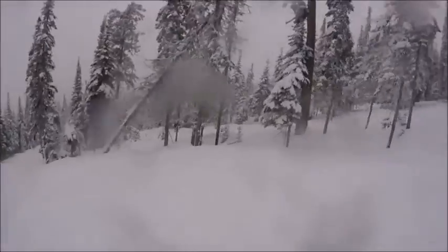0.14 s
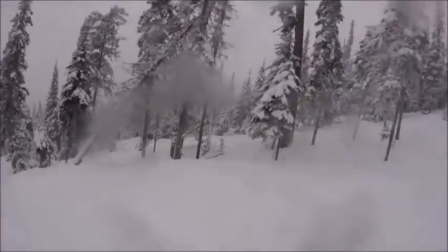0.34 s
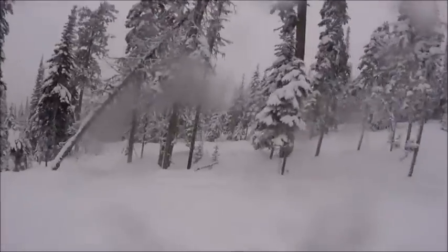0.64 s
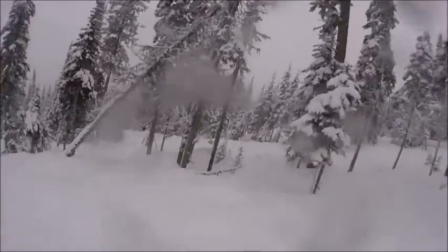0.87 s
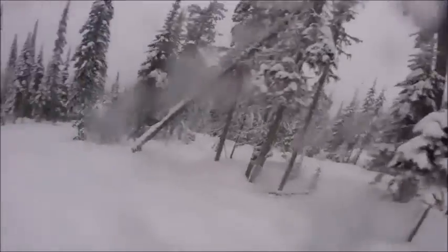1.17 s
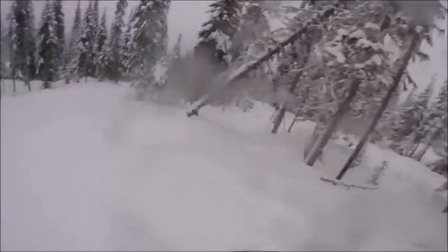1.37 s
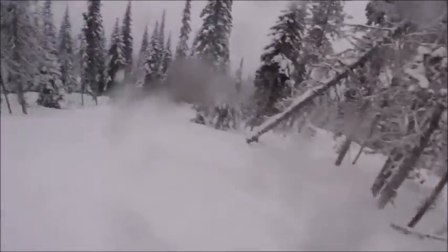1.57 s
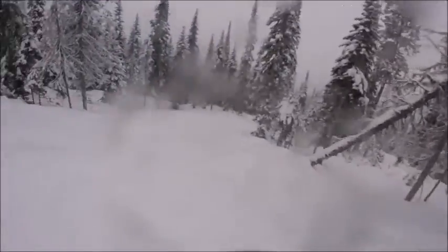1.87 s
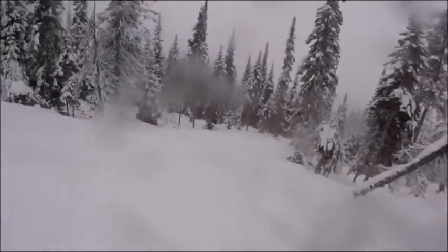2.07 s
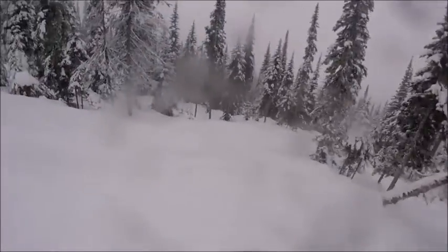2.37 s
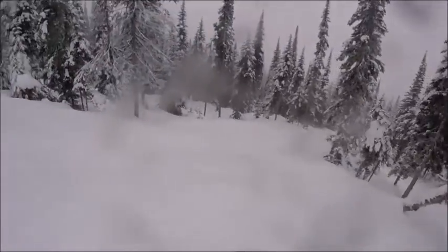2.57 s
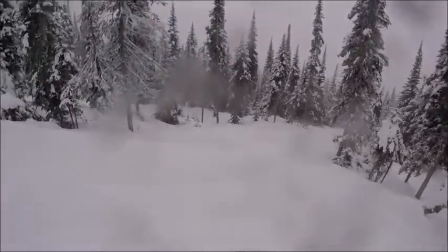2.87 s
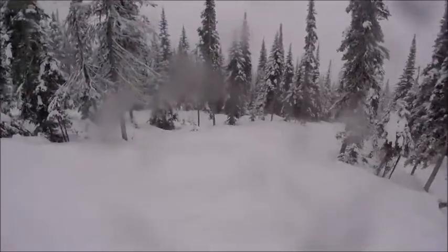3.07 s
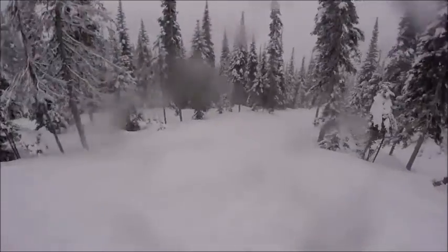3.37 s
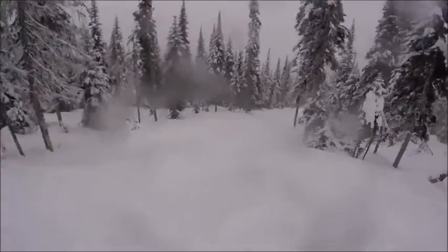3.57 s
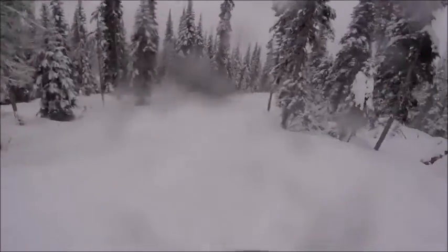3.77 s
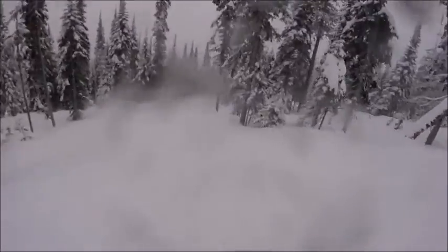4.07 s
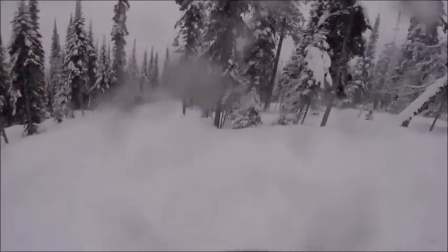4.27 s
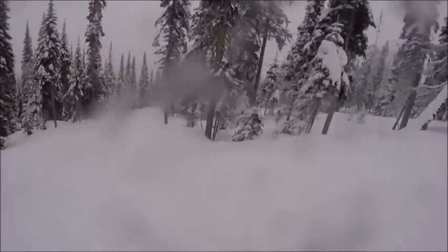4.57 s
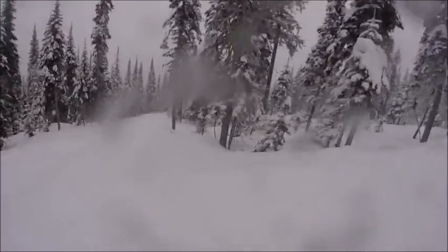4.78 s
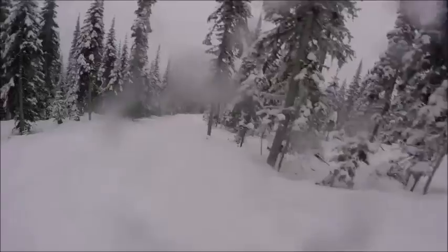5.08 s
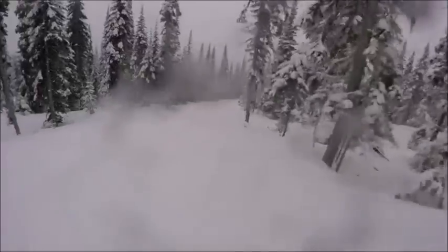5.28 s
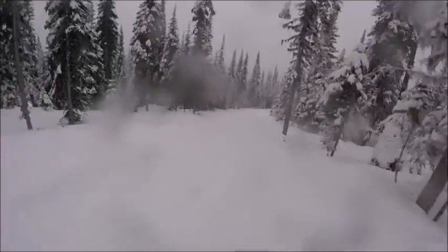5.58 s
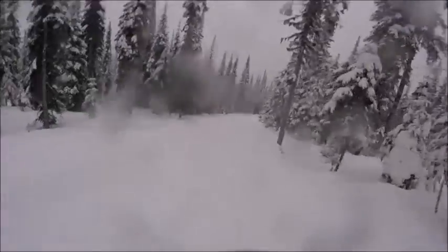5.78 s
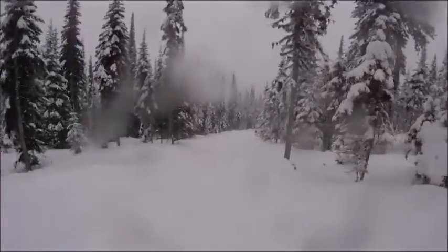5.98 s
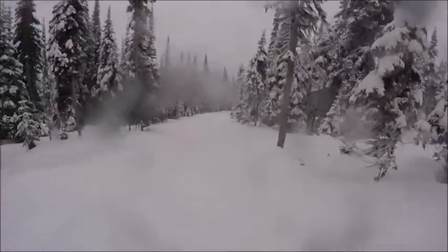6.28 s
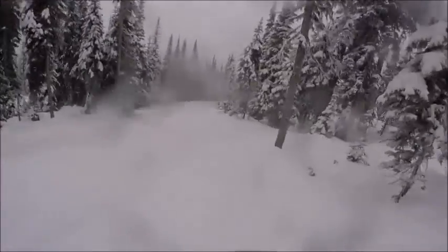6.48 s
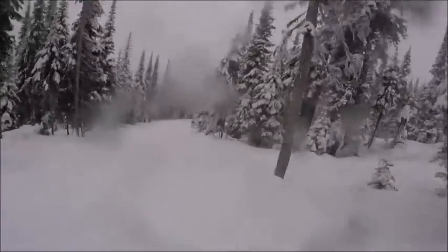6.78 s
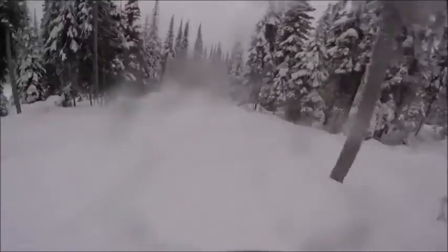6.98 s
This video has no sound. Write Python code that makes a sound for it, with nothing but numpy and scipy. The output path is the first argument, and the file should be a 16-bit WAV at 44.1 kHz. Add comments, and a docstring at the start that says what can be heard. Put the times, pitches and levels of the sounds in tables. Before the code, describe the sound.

A small camera clacks and thumps in its hard plastic housing as skis glide through deep powder, with muffled wind and faint snow ticks.

```python
"""A small camera knocks about in its hard housing as a skier glides through deep powder. Each knock is a short
push on the wall with a bright landing click and a duller lift-off click. Thuds are low swings of the soft pad
the camera falls back on; each blow leaves a slow wobble. Snow grains tick, sharp ticks come with some thuds,
and soft brushes hiss on the ringing shell, over muffled wind and ski hiss."""
import sys
import numpy as np
from scipy import signal
from scipy.io import wavfile
from scipy.ndimage import uniform_filter1d

SR = 44100
rng = np.random.default_rng(int(sys.argv[2]) if len(sys.argv) > 2 else 0)


def inscribe(sig):
    """Save sig as 16-bit PCM at rate SR to the path in sys.argv[1].

    A 1-D sig is mono; a 2-D sig holds one channel per row.
    Samples are clipped to [-1, 1] before scaling.
    """
    pcm = np.round(np.clip(np.atleast_2d(sig).T, -1, 1) * 32767)
    wavfile.write(sys.argv[1], SR, pcm.astype(np.int16))


N = 314874  # length in samples


def gain_of(db):
    """Turns decibels into a linear gain."""
    return 10 ** (np.asarray(db) / 20)


def evened(x):
    """Scales to rms 1."""
    return x / np.sqrt(np.mean(x ** 2) + 1e-20)


def add(mix, start_s, sound):
    """Mixes a sound in at a time, cut off at the end of the mix."""
    part = mix[max(round(start_s * SR), 0):][:len(sound)]
    part += sound[:len(part)]


def noise(spectrum, size, patchy_db, flicker_db, swell=0):
    """Random short-time spectra with drifting patches and a flicker shared by all bins, part of it slow."""
    frames = 4 * N // size + 5
    hz = np.fft.rfftfreq(size, 1 / SR)
    real, imaginary, patches = rng.standard_normal((frames, len(hz), 3)).T
    patches = uniform_filter1d(patches, size=5, axis=0)  # smooth over pitch
    patches = evened(uniform_filter1d(patches, size=6, axis=1))  # and over time
    point_hz, point_db = np.transpose(spectrum)
    colour_db = np.interp(np.log(hz + 1), np.log(point_hz + 1), point_db)[:, None]
    fast = rng.standard_normal(frames)
    slow = evened(uniform_filter1d(rng.standard_normal(frames), size=40))
    flicker = evened(fast + swell * slow)
    level_db = colour_db + patchy_db * patches + flicker_db * flicker
    bins = (real + 1j * imaginary) * gain_of(level_db)
    return evened(signal.istft(bins, nperseg=size, noverlap=3 * size // 4)[1][:N])


# Modes of the hard shell, relative levels: [f/Hz, level/dB, t60/s]
SHELL_MODES = [(216.8, -16.5, 0.11), (299, -26, 0.054), (680.3, -27.5, 0.092), (898, -13.5, 0.019),
               (1483, -15.5, 0.019), (1704, -6.5, 0.016), (2561, -4.5, 0.02), (3016, 1.5, 0.012),
               (3118, -4.5, 0.0092), (3570, -14, 0.032), (4143, 3, 0.0092), (4834, -7.5, 0.012),
               (5530, -5, 0.01), (6140, -20, 0.023), (7090, -2.5, 0.007), (8736, -0.5, 0.0091),
               (10700, -30, .004), (13500, -61.5, .004)]


def shell(tilt_db=0, centre_hz=3000, focus_db=0, turns=0, rise=.00025, chatter_db=-60, spot_db=0,
          size=6000):
    """Rings the shell modes, peak 1; tilt is per octave above 3 kHz, focus falls off around a centre."""
    hz, db, t60 = np.transpose(SHELL_MODES)[..., None]
    t = np.arange(size) / SR
    tilt = tilt_db * np.maximum(np.log2(hz / 3000), 0)
    focus = focus_db * np.log2(hz / centre_hz) ** 2
    mode_db = db + spot_db + tilt - focus
    modes = gain_of(mode_db - 60 * t / t60) * np.sin(2 * np.pi * (hz * t + turns))
    ring = modes.sum(0) * np.sin(np.pi / 2 * np.minimum(t / rise, 1)) ** 2
    add(ring, .0021, gain_of(chatter_db) * ring.copy())  # a second, lighter touch
    return ring / abs(ring).max()


def grit(chance, ring):
    """Lumpy noise through a ring, rms 1; chance holds two rows of noise."""
    lumps = gain_of(6.5 * evened(uniform_filter1d(chance[1], size=40)))
    return evened(signal.oaconvolve(chance[0] * lumps, ring)[:len(lumps)])


# Air noise over time: [t/s, wind level/dB, ski hiss level/dB, shell hiss level/dB]
AIR_LEVELS = [(0.0, -40.5, -63.5, -67.5), (0.55, -27.5, -60, -65), (0.95, -46.5, -62, -78),
              (1.2, -38, -60.5, -65), (1.57, -37, -62, -75.5), (1.99, -40.5, -61, -66),
              (2.56, -41.5, -62, -96), (3.14, -40.5, -62, -70), (3.52, -44.5, -61.5, -70.5),
              (4.02, -29, -59.5, -66), (4.4, -40, -61.5, -66), (4.6, -42.5, -66.5, -82),
              (4.75, -48, -66, -80), (4.9, -32, -59, -63), (5.33, -37.5, -62, -67), (5.79, -30, -58, -57),
              (6.06, -35, -64.5, -63), (6.6, -41.5, -60.5, -60), (7.14, -18.5, -55, -67)]
# Relative spectra per Hz of wind, ski hiss and the hiss lifted by the shell: [f/Hz, level/dB]
WIND_SPECTRUM = [(8.8, -46), (15, 5.5), (30, -3), (69, -20), (108, -19), (250, -30), (320, -42.5),
                 (550, -110)]
SKI_SPECTRUM = [(70, -32), (120, -8.5), (390, -7.5), (1140, -14), (2930, -19), (6000, -23.5), (7000, -22.5),
                (8200, -34), (10200, -33.5), (12300, -31.5), (13600, -39), (14800, -42), (15400, -82)]
SHELL_HISS_SPECTRUM = [(710, -48.5), (1200, -9.5), (1980, 1.5), (3320, 3.5), (4090, -14), (5170, -10),
                       (6000, -21.5), (7800, -45.5), (13200, -120)]


def air():
    """Lumpy wind, the muffled hiss of the skis, and the part of it that the shell lifts."""
    row_s, *levels_db = np.transpose(AIR_LEVELS)
    t = np.arange(N) / SR
    wind_gain, ski_gain, shell_gain = [gain_of(np.interp(t, row_s, db)) for db in levels_db]
    wind = noise(WIND_SPECTRUM, size=2048, patchy_db=6.0, flicker_db=4.5)
    skis = noise(SKI_SPECTRUM, size=256, patchy_db=1.5, flicker_db=1.5, swell=0.8)
    lifted = noise(SHELL_HISS_SPECTRUM, size=256, patchy_db=0.5, flicker_db=5.0, swell=0.8)
    return wind_gain * wind + ski_gain * skis + shell_gain * lifted


# Relative spectrum per Hz of the housing's wobble: [f/Hz, level/dB]
WOBBLE_SPECTRUM = [(8.8, -47.5), (15, 6.5), (35, 2.5), (70, -24.5), (130, -36), (250, -85.5)]
WOBBLE_DB, WOBBLE_SLOPE, WOBBLE_T60 = -23.5, 0.56, 0.33  # dB; dB per dB of blow; s


def wobble():
    """Each blow leaves the housing wobbling: low noise that swells at the blow and dies away."""
    t, sway = np.arange(SR // 2) / SR, np.zeros(N)
    for start_s, blow_db, *_ in KNOCK_EVENTS + THUD_EVENTS:
        fade = gain_of(WOBBLE_DB + WOBBLE_SLOPE * blow_db - 60 * t / WOBBLE_T60)
        add(sway, start_s, fade * np.minimum(t / 0.017, 1))
    return sway * noise(WOBBLE_SPECTRUM, size=2048, patchy_db=4.5, flicker_db=0.5)


# Soft brushes of snow or cloth along the shell:
# [t/s, level/dB, centre f/Hz, treble level/dB against the level, length/s]
BRUSH_EVENTS = [(0.656, -51, 2560, -32, 0.033), (0.303, -59, 3000, -40, 0.024),
                (0.493, -54, 2960, -32, 0.042), (0.868, -43.5, 3000, -37, 0.019),
                (1.784, -52, 3700, -22, 0.048), (2.001, -55.5, 3660, -15, 0.055),
                (3.7, -47.5, 3450, -33, 0.048), (4.109, -51.5, 3500, -28, .04),
                (4.518, -52.5, 2920, -48, 0.04), (5.659, -56, 3020, -12, 0.037),
                (5.534, -61, 2090, -21, 0.013), (6.891, -46.5, 4000, -9.5, 0.024)]


def brushes():
    """Gritty rubbing rings the shell around a centre, with some treble; each brush swells and fades."""
    out, t = np.zeros(N), np.arange(4000) / SR
    treble = signal.firwin(63, [10000, 14500], pass_zero=False, fs=SR)
    chances = rng.standard_normal((len(BRUSH_EVENTS), 2, len(t)))
    for (start_s, db, hz, treble_db, length_s), chance in zip(BRUSH_EVENTS, chances):
        body = grit(chance, shell(centre_hz=hz, focus_db=9.0, size=1200))
        sound = body + gain_of(treble_db) * grit(chance, treble)
        swell = np.sin(np.pi * np.minimum(t / length_s, 1))
        add(out, start_s, gain_of(db) * sound * swell)
    return out


SLIP_S = 0.0028  # the burst of slips fades 26 dB in this time


def tick(db, hz, snap_db, chance):
    """A burst of tiny slips rings the shell near a centre, with a treble snap."""
    t, modes = np.arange(1200) / SR, len(SHELL_MODES)
    slips = chance[modes:] * gain_of(-26 * t / SLIP_S)
    response = shell(centre_hz=hz, focus_db=12.5, turns=chance[:modes, None], size=1200)
    ring = np.convolve(slips, response)
    treble = signal.firwin(95, [6150, 9700, 10740, 14500], pass_zero=False, fs=SR)  # two bands
    snap = np.convolve(slips, treble)
    add(ring, 0, abs(ring).max() * gain_of(snap_db) * snap / abs(snap).max())
    return gain_of(db) * ring / abs(ring).max()


# Loudest ticks and scrapes on the shell:
# [t/s, peak level/dB, centre f/Hz, treble snap level/dB against the ring's peak]
TICK_EVENTS = [(0.122, -44, 5350, -24), (0.5683, -35, 3260, -8), (0.666, -39, 2580, -34),
               (0.7196, -40.5, 1580, 3), (1.325, -39, 2930, -26), (1.3603, -30, 1730, -1),
               (1.798, -50, 3070, -9), (1.8137, -38, 3000, -1), (1.988, -45, 3320, 2),
               (2.082, -41.5, 3140, -6), (2.149, -39, 2920, -1), (2.534, -44, 3430, -1),
               (2.702, -42, 4460, -35), (2.941, -46, 3350, -6), (3.3044, -44.5, 2880, -4),
               (3.343, -38, 3520, -5), (3.4102, -38, 4230, -15), (3.4668, -42, 2990, 11),
               (3.501, -41, 2300, -35), (3.712, -53, 3000, -53), (3.726, -23.5, 2870, -42),
               (3.9064, -42, 1570, 1), (4.0757, -32.5, 3000, -39), (4.086, -33, 1490, -32),
               (4.1012, -28, 1700, -6), (4.18, -47, 1500, 16), (4.2606, -41, 3060, -38),
               (4.4333, -34, 1570, -5.5), (4.641, -48.5, 2720, -18), (4.6633, -37, 4600, -10),
               (4.909, -35.5, 1850, -47), (4.9214, -38, 3020, -41), (4.966, -36.5, 3020, -40),
               (5.2052, -38, 2860, -6), (5.2225, -36.5, 3220, -8), (5.23, -37.5, 1660, -2),
               (5.246, -35, 2820, -31), (5.3, -41.5, 2420, -6), (5.3678, -39.5, 2550, -4),
               (5.5374, -32, 2130, -18), (5.657, -40, 2320, -4), (5.6785, -42, 2600, 10),
               (5.815, -28.5, 1680, -11), (5.878, -38.5, 2740, -29), (6.246, -44, 2900, -22),
               (6.389, -31, 3080, -6), (6.41, -36.5, 2340, -5), (6.644, -41, 3040, -12),
               (6.654, -36, 3100, -8), (6.9006, -43, 3660, -9), (6.907, -41, 1510, -3),
               (6.933, -33.5, 2900, -22), (6.963, -36, 1500, 3), (6.9695, -27.5, 3000, -4),
               (7.0797, -40.5, 1500, -4)]


def grains():
    """Tiny slips on the shell: the loud ticks, several of which come with the thuds, and a patter of faint ones
    set off by snow grains."""
    out, draws = np.zeros(N), 1200 + len(SHELL_MODES)
    for (start_s, *row), chance in zip(TICK_EVENTS, rng.standard_normal((len(TICK_EVENTS), draws))):
        add(out, start_s, tick(*row, chance))
    for chance in rng.standard_normal((12, draws)):  # twelve kinds of faint tick
        hit_db = -59 + 5.7 * np.minimum(rng.exponential(1, N), 3)
        hits = gain_of(hit_db) * (rng.random(N) < 3.5 / SR)  # 3.5 a second on average
        faint = tick(0, 3000 * 1.8 ** np.tanh(chance[0]), -7 + 5 * chance[1], chance)
        out += signal.oaconvolve(hits, faint)[:N]
    return out


# Camera back on the soft pad: [t/s, level/dB, first swing f/Hz, t60/s]
THUD_EVENTS = [(0.1322, -22.5, 37, 0.036), (0.3941, -11.5, 64.6, 0.083), (0.7162, -6, 64.7, 0.081),
               (0.8977, -8.5, 66, 0.054), (1.3581, -4.5, 73.4, 0.14), (1.48, -17.5, 67.6, 0.1),
               (2.037, -26, 62.4, 0.13), (2.306, -21.5, 36.5, 0.074), (3.9, -6, 62.5, 0.087),
               (4.104, 0, 73.3, 0.086), (4.4368, -2, 69, 0.13), (4.9618, -18, 35.3, 0.053),
               (5.302, -23.5, 34.4, 0.05), (5.5649, -23, 37.2, 0.042), (5.7271, -13.3, 64, 0.05),
               (5.8165, -1, 64, 0.11), (6.2357, -25, 36.6, 0.027), (6.4576, -19, 33.2, 0.021),
               (6.64, -23.5, 33.7, 0.047), (6.9635, -5, 60, 0.034), (7.096, -4.5, 66.4, 0.081)]
DIP, PAD_HZ = 0.62, 50.1  # depth of the first dip 0-1; later ring of the pad
RUB_DB, RUB_SLOPE = -38, 1.27  # dB; dB per dB of thud


def thuds():
    """The pad is squeezed, springs back and rings low; the shell's low modes ring and the camera rubs it."""
    t, out = np.arange(-900, 8000) / SR, np.zeros(N)
    chances = rng.standard_normal((len(THUD_EVENTS), 2, len(t)))
    low = shell(centre_hz=350, focus_db=5.5, rise=0.0011)
    mid_turns = rng.random((len(SHELL_MODES), 1))
    mid = shell(centre_hz=700, focus_db=4.0, turns=mid_turns, size=180)
    for (start_s, db, swing_hz, t60), chance in zip(THUD_EVENTS, chances):
        top = .5 / swing_hz  # end of the first half swing
        turns = np.where(t < top, swing_hz * t, .5 + PAD_HZ * (t - top))
        growth = np.interp(t, [0, top], [DIP, 1])
        height = np.where(t < top, growth, gain_of(-60 * (t - top) / t60))
        squeeze = DIP / (1 + (t * swing_hz / 0.18) ** 2)
        swing = -np.where(t < 0, squeeze, height * np.cos(2 * np.pi * turns))
        body = uniform_filter1d(swing, size=40)
        stroke = np.clip((t + .009) / .005, 0, 1) * gain_of(-60 * np.maximum(t - .006, 0) / .1)
        rub = gain_of(RUB_DB + RUB_SLOPE * db) * grit(chance, mid) * stroke
        add(out, start_s + t[0], gain_of(db) * body + rub)
        add(out, start_s - .004, gain_of(1.1 * db - 20.5) * low)
    return out


# Camera against the hard wall:
# [t/s, push level/dB, lift-off click level/dB, share that stays on the wall and rings 0-1]
KNOCK_EVENTS = [(0.2715, -5.5, -18, 0.42), (0.287, -10, -27, 0.04), (0.3026, -18, -28, 0),
                (0.4866, -19.5, -26.5, 0.2), (0.5329, -8.5, -51, 0.59), (0.793, -6, -16, 0),
                (0.8392, -5, -16, 0.32), (0.857, -11.5, -21, 0.3), (1.2271, -2.5, -16, 0.12),
                (1.2435, -4.5, -21.5, 0.68), (2.1761, -17.5, -28, 0.07), (3.5561, -13, -29.5, 0.71),
                (3.8431, -2.5, -15, 0.2), (3.861, -14.5, -20.5, 0.3), (3.9972, -3.5, -15.5, 0.29),
                (4.009, -6.5, -33, 0.5), (4.358, -2, -14.5, 0.25), (4.3736, -6.5, -21.5, 0),
                (4.39, -10, -28, 0.18), (4.4969, -2, -15.5, 0.12), (4.511, -6, -21.7, 0.37),
                (4.5283, -17, -26.5, 0.16), (4.8506, -5, -19, 0.38), (4.864, -9.5, -33, 0.46),
                (5.1649, -4.5, -17, 0.37), (5.18, -9, -32, 0.74), (5.7688, -2.5, -15.5, 0.3),
                (5.955, -1.5, -15, 0.13), (5.969, -4, -32, 0.74), (6.1132, -9, -20.5, 0.03),
                (6.3821, -18, -28.5, 0.2), (6.799, -6, -19, 0.13), (6.818, -10, -27, 0.62),
                (7.0209, -2, -14, 0.3), (7.0406, -6, -20, 0)]
CONTACT_S, MOUNT_HZ, MOUNT_T60 = 0.007, 82.9, 0.15  # time on the wall; ring of the camera held on it
VENT_HZ, VENT_DAMPING = 22.4, 0.48  # pressure leaks away behind the microphone
LAND_DB, LAND_SLOPE, REBOUND_DB = -8.5, 1.225, -1  # landing click follows the push; rebounds are softer
REBOUND_S = .03  # a landing this soon after another is a rebound
LIFT_S, REBOUND_LIFT_S, LIFT_SPREAD_S = .0066, .0072, .0003  # time to lift-off and its random spread
STAY_LIFT_S = 0.0014  # a rebound that stays fully on the wall lifts off this much later
SPOT_DB = 2.0  # each blow lands on another spot and weights the modes differently


def knocks():
    """A short force while the camera is on the wall, a landing click and a duller, inverted lift-off."""
    t, out = np.arange(7000) / SR, np.zeros(N)
    w = 2 * np.pi * VENT_HZ
    vent = signal.bilinear([1, 0, 0], [1, 2 * VENT_DAMPING * w, w ** 2], SR)
    force = abs(np.sin(np.pi * np.minimum(t / CONTACT_S, 1))) ** 1.61
    bounce = signal.lfilter(*vent, force)
    bounce /= bounce.max()
    stay = np.sin(2 * np.pi * MOUNT_HZ * t) * gain_of(-60 * t / MOUNT_T60) * np.minimum(t / 0.0013, 1)
    stay /= stay.max()
    phases = .03 * rng.standard_normal((len(KNOCK_EVENTS), 2, len(SHELL_MODES), 1))  # turns
    spots = SPOT_DB * rng.standard_normal(phases.shape)
    shakes = rng.standard_normal((len(KNOCK_EVENTS), 2, len(t)))
    dull_ring = shell(tilt_db=-20.0, focus_db=-1.0, size=1200)
    rebounds = np.diff([row[0] for row in KNOCK_EVENTS], prepend=0) < REBOUND_S
    for row, again, phase, spot, shake in zip(KNOCK_EVENTS, rebounds, phases, spots, shakes):
        start_s, push_db, lift_db, share = row
        share = np.clip(share, 0, 1)
        add(out, start_s - .0001, gain_of(push_db) * ((1 - share) * bounce + share * stay))

        land_db = LAND_DB + LAND_SLOPE * push_db + REBOUND_DB * again
        land = shell(tilt_db=0.62 * (land_db - 4), turns=phase[0], spot_db=spot[0],
                     chatter_db=-23.0)  # soft landings are dull
        add(out, start_s, gain_of(land_db) * land)

        wait_s = REBOUND_LIFT_S + STAY_LIFT_S * share if again else LIFT_S
        wait_s += LIFT_SPREAD_S * np.tanh(shake[0, 0])
        lift = shell(tilt_db=-17.0, turns=phase[1], spot_db=spot[1], rise=0.0015, chatter_db=-15.5)
        add(out, start_s + wait_s - .0004, -gain_of(lift_db) * lift)

        fade = gain_of(0.34 * lift_db - 28 - 60 * t / 0.075) * np.minimum(t / 0.0015, 1)
        add(out, start_s, fade * grit(shake, dull_ring))  # loose parts buzz
    return out


def scene():
    """All sources at one microphone."""
    return (air() + wobble() + brushes() + grains() + thuds() + knocks())[None]


EDGE_HZ = 15900  # upper band limit


def record(dry):
    """The highest peaks are rounded off softly; then the band limit."""
    over = np.maximum(abs(dry) - .75, 0)  # part above the knee
    rounded = dry - np.sign(dry) * (over - .2 * np.tanh(over / .2))
    padded = np.pad(rounded, ((0, 0), (255, 255)), "reflect")
    lowpass = signal.firwin(511, EDGE_HZ, window=("kaiser", 9), fs=SR)
    return signal.oaconvolve(padded, lowpass[None], "valid")


dry = scene()
out = record(dry)
inscribe(out)
```